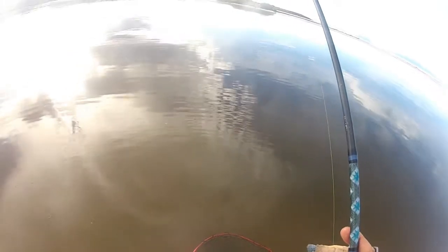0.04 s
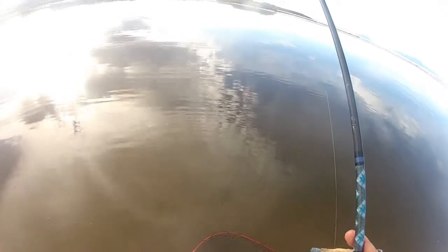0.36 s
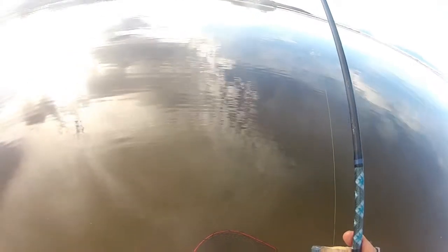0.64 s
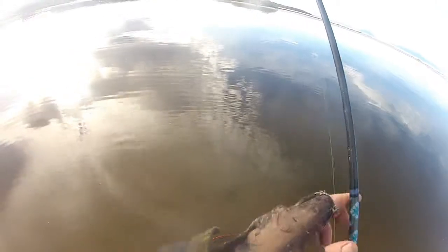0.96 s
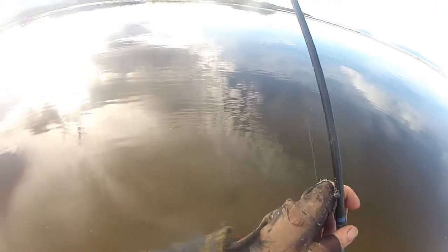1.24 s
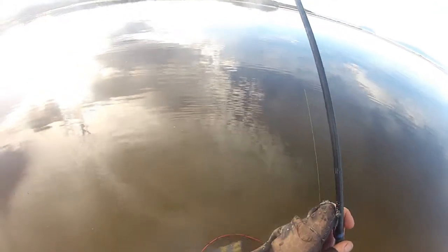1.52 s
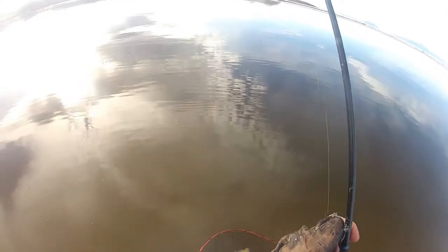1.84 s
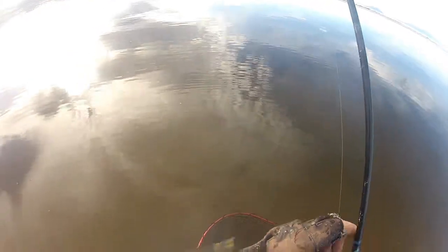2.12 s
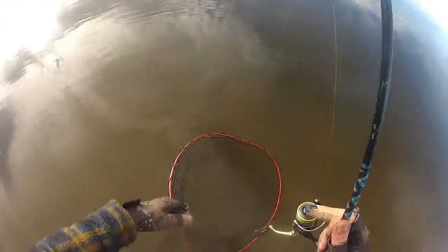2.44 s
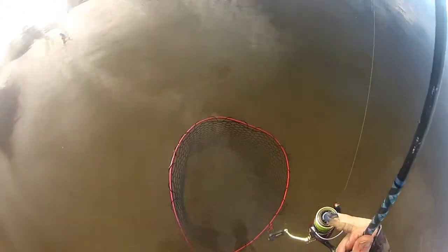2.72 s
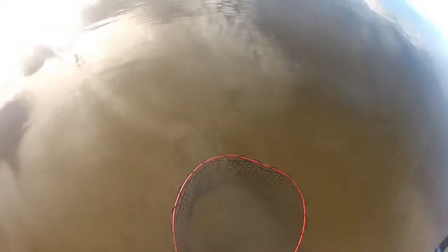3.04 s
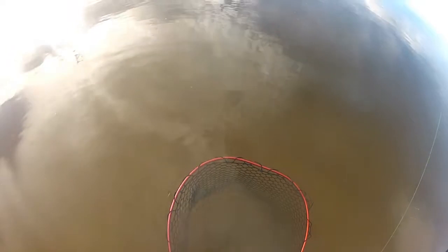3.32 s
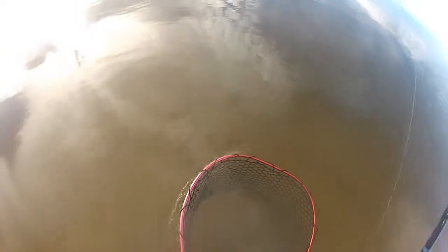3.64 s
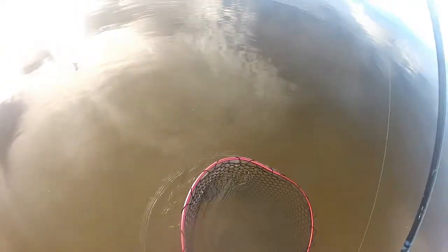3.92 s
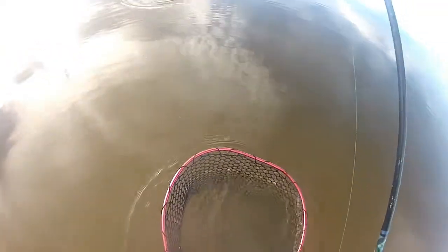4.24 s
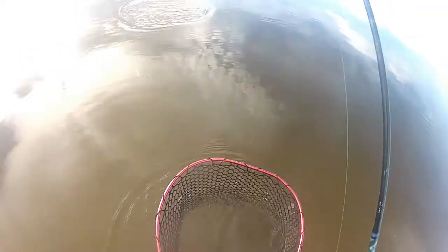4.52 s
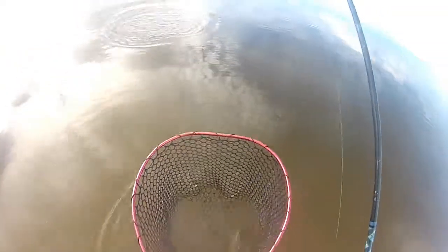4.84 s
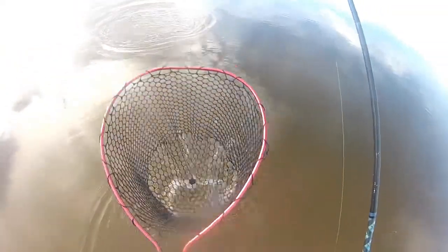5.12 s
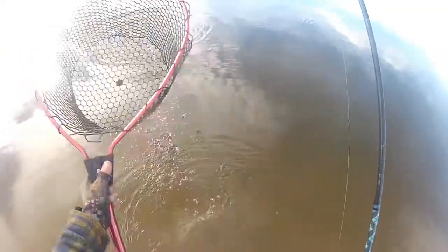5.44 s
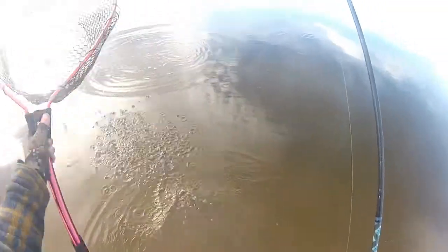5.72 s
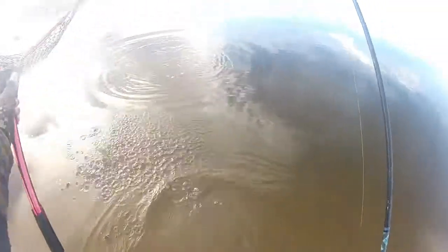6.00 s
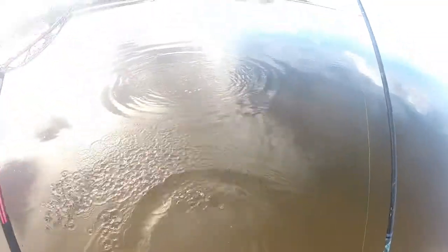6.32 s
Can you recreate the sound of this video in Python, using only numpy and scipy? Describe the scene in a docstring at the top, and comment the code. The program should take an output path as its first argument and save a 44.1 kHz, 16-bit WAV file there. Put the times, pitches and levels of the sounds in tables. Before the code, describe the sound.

Shallow water washes low and steady while a landing net sloshes through it, with one hollow knock, then trickles and drips.

```python
"""A calm estuary, heard close up from a camera worn by a wading angler; its recorder cuts the highs.
At first the water churns in a low wash, tackle ticks and a sleeve brushes by. Three seconds in, the
rod butt knocks the housing and a landing net pushes through the shallows, folding in air that rings
as bubbles. Then the net lifts out, trickling and dripping to the end. Throughout, the camera's
stepped converter adds a thin sheen of treble."""
import sys
import numpy as np
from scipy import signal
from scipy.fft import rfft, irfft, next_fast_len
from scipy.io import wavfile
from scipy.ndimage import map_coordinates

SR = 44100
rng = np.random.default_rng(int(sys.argv[2]) if len(sys.argv) > 2 else 0)


def put_to_file(sound):
    """Save the sound as 16-bit audio at rate SR, in the file named by the first command-line argument."""
    columns = np.atleast_2d(sound).T  # one column per channel
    safe = np.clip(columns, -1, 1)
    whole_steps = np.round(safe * 32767)
    wavfile.write(sys.argv[1], SR, whole_steps.astype(np.int16))


N = 280917

# The net's steady pull through the water. Each row: time in seconds, level in dB.
NET_DRAG = [(0, -75.5), (2.2, -77), (2.8, -69.5), (3.65, -69), (4.1, -68), (4.5, -65), (5.0, -64.5),
            (5.9, -66.5), (6.37, -66)]
# Pushes and lifts of the net. Each row: peak time in seconds, level in dB, length in seconds,
# level in dB of the water running off the mesh.
NET_MOVES = [(3.165, -48.5, 0.032, -72), (3.195, -58, 0.046, -79), (3.348, -58.5, 0.1, -76),
             (3.497, -57.5, 0.15, -73), (3.77, -62, 0.076, -63), (5.05, -60, .1, -68),
             (5.25, -60, .26, -63), (5.59, -69, 0.15, -66), (6.276, -78, 0.078, -74)]
def stirring():
    """How strongly the net stirs the shallows: its steady drag plus each push and lift."""
    pushes = swells([(s, db, length) for s, db, length, _ in NET_MOVES])
    return np.hypot(amp(curve(NET_DRAG)), pushes)


def gurgle(stir):
    """Within the angler's reach, the moving net folds air into the water as ringing bubbles."""
    return amp(-1.1) * stir * bubble_cloud(count=2400, hz=1434, scatter=0.4, cycles=22)


def trickle():
    """Threads of water leave the mesh and fizz on the surface as many small bubbles."""
    run_off = swells([(s, db, length) for s, _, length, db in NET_MOVES])
    flow = np.hypot(run_off, amp(curve(NET_DRAG) - 8.5))
    return flow * bubble_cloud(count=5000, hz=4560, scatter=0.11, cycles=64)


# Spray off the net's rim. Each row: peak time in seconds, level in dB.
RIM_SPURTS = [(3.159, -51), (3.36, -51), (3.392, -53.5), (3.425, -60), (3.448, -53), (3.478, -55),
              (3.5, -53), (3.528, -62), (3.582, -56)]
def spray(attack_s=0.0037, decay_s=0.01):
    """The rim cuts the surface and throws spurts of fine bubbles, all much the same size."""
    s, db = np.transpose(RIM_SPURTS)[:, :, None]
    t = np.arange(N) / SR - s
    spurts = amp(db) * np.exp(-np.abs(t) / np.where(t < 0, attack_s, decay_s))
    return spurts.sum(axis=0) * bubble_cloud(count=3000, hz=4080, scatter=0.068, cycles=40)


# The drops loudest at the microphone. Each row: start in seconds, peak level in dB, pitch in Hz.
LOUD_DROPS = [(3.159, -35.5, 4000), (3.191, -43, 1060), (3.347, -27.5, 425), (3.391, -43, 1530),
              (3.475, -42.5, 2870), (3.533, -42.5, 4240), (3.5815, -37.5, 4200), (3.7378, -37, 4050),
              (3.779, -42, 2380), (4.3048, -54, 2530), (4.3143, -35.5, 1830), (4.3164, -39.5, 4380),
              (4.428, -47, 1450), (5.0993, -46.5, 4570), (5.189, -45.5, 4650), (5.2826, -46, 4140),
              (5.2994, -38.5, 4030), (5.303, -39.5, 4700), (5.3894, -42, 3940), (5.5155, -47, 4430),
              (5.5902, -38, 5220), (6.015, -53, 5170), (6.2873, -41.5, 4350), (6.2995, -45, 1260),
              (6.305, -43, 1730)]
def drops():
    """Single drops ring the bubbles they trap; smaller, higher ones ring for more cycles."""
    hz = np.array(LOUD_DROPS)[:, 2:]
    return bubbles(LOUD_DROPS, cycles=39 * (hz / 4000) ** 0.6, rise=0.15, onset_cycles=0.5)


def dripping(count=14, from_s=4.6):
    """Faint drips fall at random from the lifted net."""
    when, size, pitch = rng.random((count, 3)).T
    s = from_s + when * (N / SR - from_s)
    db = -52.5 + 6 * (size - 0.5)
    hz = 4800 * np.exp(0.2 * (pitch - 0.5))
    return bubbles(np.column_stack([s, db, hz]), cycles=33, rise=0.12, onset_cycles=0.81)


# Blows on the camera housing. Each row: start in seconds, strength in dB.
ROD_BLOWS = [(3.0177, -3), (3.136, -36), (3.148, -30), (3.157, -33), (3.166, -25.5)]
# The housing's resonances. Each row: centre in Hz, width in Hz, relative gain in dB.
HOUSING_MODES = [(374, 134, -6.5), (601, 124, 6), (840, 167, -1), (1150, 140, -12), (1850, 120, -22.5),
                 (2740, 200, -27.5), (3820, 110, -30)]
def knocks():
    """Right at the microphone, the rod butt bumps the housing, which gives a short hollow tock."""
    blows = np.zeros(N)
    for s, db in ROD_BLOWS:
        blows[round(s * SR)] = amp(db)
    tock = resonate(blows, HOUSING_MODES)
    return tock * blows.max() / np.abs(tock).max()


# Snaps of reel, line and net frame. Each row: start in seconds, peak level in dB, pitch in Hz.
TACKLE_TICKS = [(0.1549, -42.5, 3770), (1.0555, -31.5, 5000), (1.1015, -47, 3570), (2.3376, -33, 4440),
                (2.379, -49, 4300), (2.403, -45, 4570), (2.445, -44.5, 4480), (3.689, -38.5, 4300),
                (3.7788, -36, 4700), (3.867, -42, 4500), (4.1413, -44, 4000), (4.263, -46, 5000),
                (5.426, -41.5, 5100), (5.614, -41, 5000), (6.0943, -43.5, 4100), (6.2113, -39, 4470),
                (6.2428, -36, 4950)]
def tackle():
    """Small hard contacts close by: a bright snap of a few cycles over a weaker, lower knock."""
    s, db, _ = np.transpose(TACKLE_TICKS)
    snap = bubbles(TACKLE_TICKS, cycles=9.7, rise=0, onset_cycles=1)
    knock_rows = np.column_stack([s, db - 8.5, np.full_like(s, 2300)])
    return snap + bubbles(knock_rows, cycles=8.3, rise=0, onset_cycles=0.93)


# A sleeve passes the microphone. Each row: peak time in seconds, level in dB, length in seconds.
SLEEVE_BRUSHES = [(.85, -65.5, 0.31), (1.5, -70.5, 0.37), (2.34, -59, 0.024), (2.425, -56.5, 0.058),
                  (2.93, -57, 0.092), (3.06, -56.5, 0.07)]
# The tone of mesh and cloth. Each row: frequency in Hz, relative level in dB.
SWISH_SPECTRUM = [(400, -8), (900, 3.5), (1500, -6), (2000, 5.5), (2900, -2), (3400, -5.5), (3950, -1),
                  (4400, -14), (6000, -16)]
def swish(stir):
    """Wet mesh and cloth brush along in a dense, uneven crackle."""
    drag = amp(curve(NET_DRAG))
    mesh = amp(-70) * drag / drag.mean() * (stir / drag) ** 0.59  # 0.59 dB per dB that a push adds
    flicker = amp(4 * wobble(25))
    crackle = coloured(grains(rate=2500, spread_db=1), SWISH_SPECTRUM)
    return np.hypot(swells(SLEEVE_BRUSHES), mesh) * flicker * crackle


# The low wash of water and air around the angler. Each row: time in seconds, level in dB.
WASH_LEVEL = [(0, -42.5), (1.1, -41), (2.1, -41), (3.1, -39), (3.9, -40.5), (4.55, -40), (6.37, -40.5)]
# The tones of the wash and its hiss. Each row: frequency in Hz, relative level in dB.
WASH_SPECTRUM = [(15, -40), (25, -20.5), (112, -2.5), (278, -1), (527, -5.5), (831, -22.5), (1400, -39),
                 (1820, -74), (3080, -120)]
HISS_SPECTRUM = [(500, -12), (900, -5), (1300, 4.5), (1850, -3), (2300, -0.5), (3000, 1), (3600, -8),
                 (5000, -11.5), (6000, -13.5)]
def wash():
    """Behind it all the estuary churns: a dull rush with low lumps in it, and a faint hiss above."""
    rush = coloured(rng.standard_normal(N), WASH_SPECTRUM)
    lumps = coloured(grains(rate=90, spread_db=1.5), WASH_SPECTRUM)
    level = amp(curve(WASH_LEVEL) + 0.62 * wobble(9.9))
    hiss = coloured(rng.standard_normal(N), HISS_SPECTRUM)
    return level * unit(rush + 0.3 * lumps) + amp(-64.5) * hiss


def bubbles(rows, cycles, rise, onset_cycles):
    """Each (s, peak dB, Hz) row rings down 60 dB in `cycles`, its pitch up by the fraction `rise`."""
    s, db, hz = np.transpose(rows)[:, :, None]
    turns = hz * np.arange(SR // 30) / SR
    age = turns / cycles
    tone = np.sin(2 * np.pi * turns * (1 + rise * np.minimum(age, 1) / 2))
    ring = tone * np.exp(-np.log(1000) * age) * (1 - np.exp(-turns / onset_cycles))
    ring *= amp(db) / np.abs(ring).max(axis=1, keepdims=True)
    where = np.round(s * SR).astype(int) + np.arange(ring.shape[1])
    return np.bincount(where.ravel(), ring.ravel(), N)[:N]


def bubble_cloud(count, hz, scatter, cycles):
    """A random swarm of bubbles around one pitch, each rising as it nears the surface; rms 1."""
    when, size, pitch = rng.random(count), rng.standard_normal(count), rng.standard_normal(count)
    size_db = 3.5 * np.clip(size, -2, 2)
    rows = np.column_stack([when * N / SR, size_db, hz * np.exp(scatter * pitch)])
    return unit(bubbles(rows, cycles, rise=0.13, onset_cycles=1))


def swells(rows, rise_share=0.54):
    """Gain of (s, level dB, length s) movements, each a bell that builds up and dies away."""
    s, db, length = np.transpose(rows)[:, :, None]
    t = np.arange(N) / SR - s
    width = length * np.where(t < 0, rise_share, 1 - rise_share)
    return np.linalg.norm(amp(db) * np.exp(-(t / width) ** 2 / 2), axis=0)


def grains(rate, spread_db):
    """Random tiny impacts of uneven size, rate a second."""
    impacts = (rng.random(N) < rate / SR) * rng.choice([-1, 1], N)
    return impacts * amp(spread_db * np.clip(rng.standard_normal(N), -2, 2))


def resonate(x, modes):
    """x through (Hz, width Hz, dB) resonances; the second, main one swings against the rest."""
    def response(f):
        return sum((-1 if i == 1 else 1) * amp(db) * 1j * f * width / (hz**2 - f**2 + 1j * f * width)
                   for i, (hz, width, db) in enumerate(modes))
    return filtered(x, response)


def coloured(x, points):
    """x shaped by (Hz, dB) points on a log axis, at rms 1."""
    hz, db = np.transpose(points)
    return unit(filtered(x, lambda f: amp(np.interp(np.log(f + 1), np.log(hz), db, -120, -120))))


def filtered(x, response):
    """x through a complex response of frequency."""
    size = next_fast_len(N + SR // 4)
    return irfft(rfft(x, size) * response(np.fft.rfftfreq(size, 1 / SR)), size)[:N]


def wobble(rate):
    """A smooth random curve, rate knots a second."""
    return map_coordinates(rng.standard_normal(4096), [np.arange(N) * rate / SR], mode="wrap")


def curve(rows):
    """(s, value) rows as one value per sample."""
    return np.interp(np.arange(N) / SR, *np.transpose(rows))


def amp(db):
    """Decibels to gain."""
    return 10 ** (np.asarray(db) / 20)


def unit(x):
    """Scale to rms 1."""
    return x / np.sqrt(np.mean(x ** 2) + 1e-20)


def scene():
    """Water, net and tackle at the one microphone on the angler's body."""
    stir = stirring()
    water = wash() + gurgle(stir) + trickle() + spray() + drops() + dripping()
    return (water + swish(stir) + tackle() + knocks())[None]


def record(dry):
    """The recorder cuts the highs; its slow converter holds each value, mirroring a faint treble."""
    edge_hz, hold_hz, top_hz = 5680, 12000, 15450
    muffled = filtered(dry[0], lambda f: 1 / np.sqrt(1 + (f / edge_hz) ** 44))
    slow_samples = signal.resample(muffled, round(N * hold_hz / SR))
    steps = np.repeat(slow_samples, 4)
    return filtered(signal.resample(steps, N), lambda f: f < top_hz)[None]


dry = scene()
out = record(dry)
put_to_file(out)
```